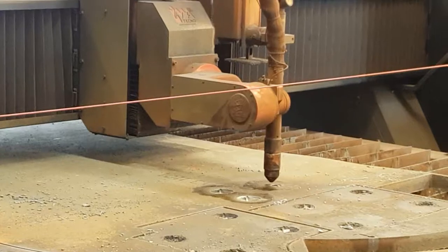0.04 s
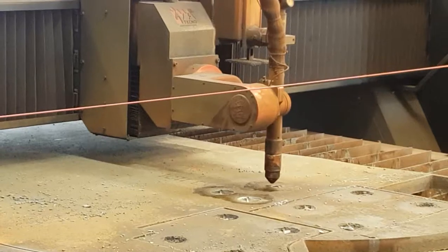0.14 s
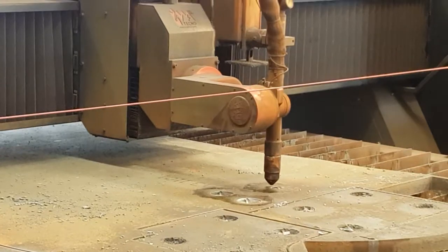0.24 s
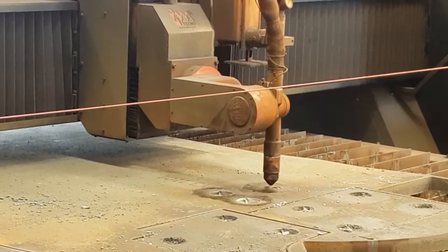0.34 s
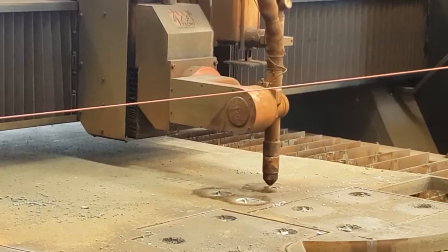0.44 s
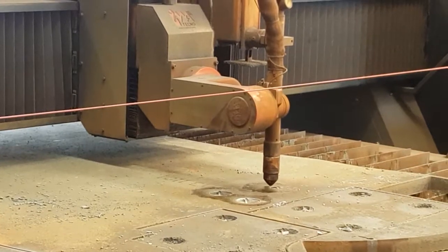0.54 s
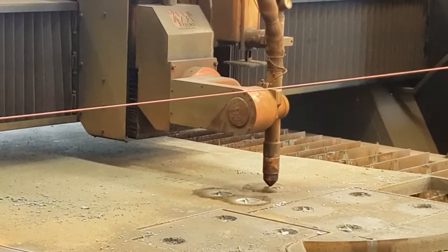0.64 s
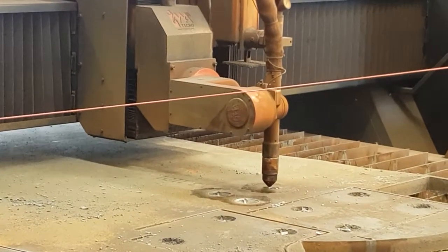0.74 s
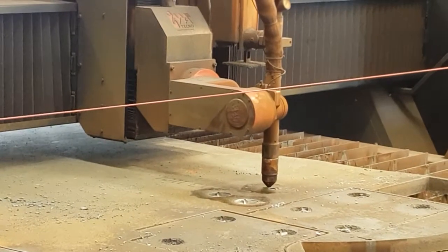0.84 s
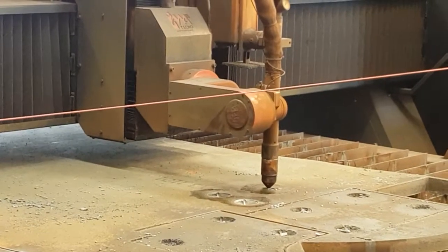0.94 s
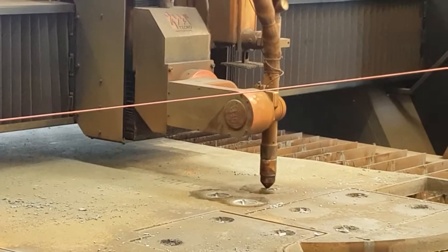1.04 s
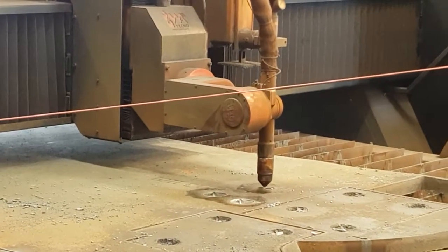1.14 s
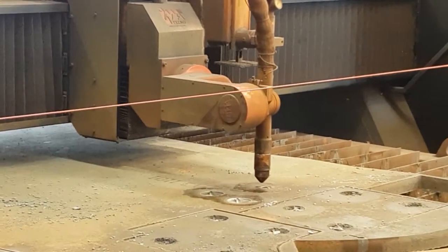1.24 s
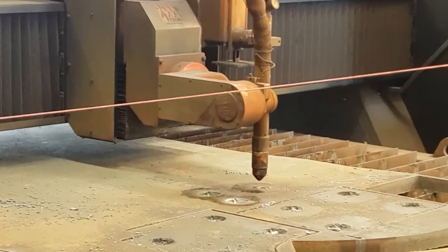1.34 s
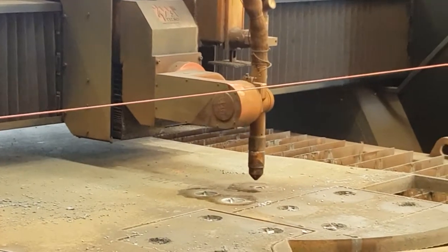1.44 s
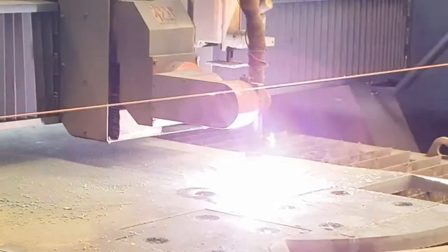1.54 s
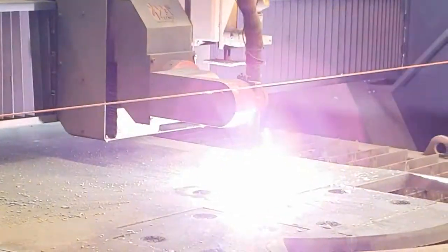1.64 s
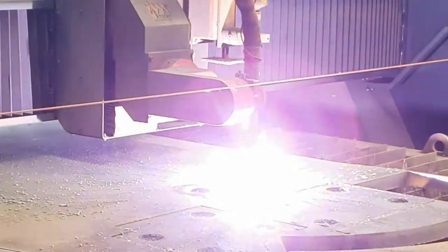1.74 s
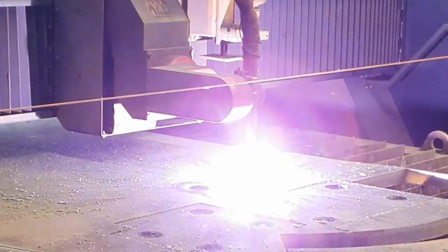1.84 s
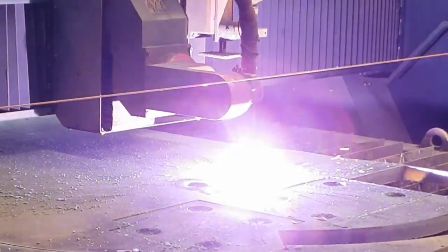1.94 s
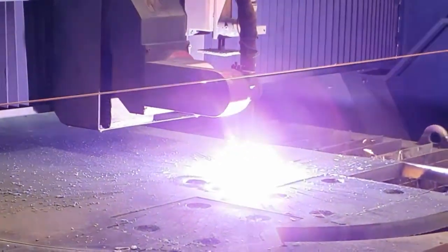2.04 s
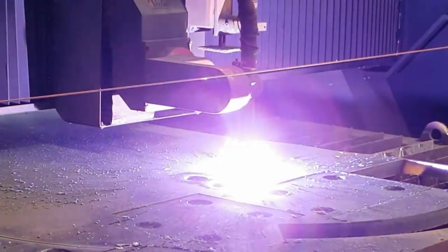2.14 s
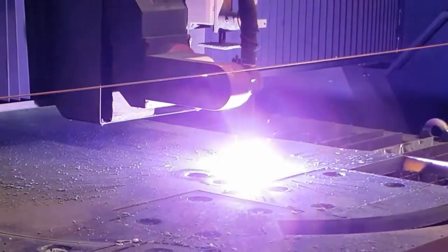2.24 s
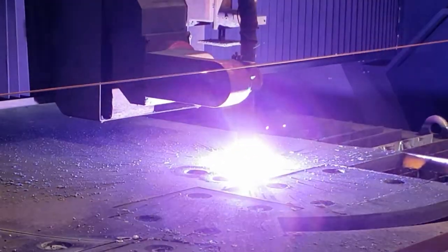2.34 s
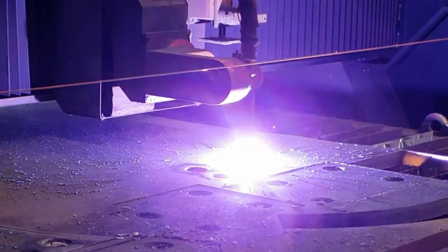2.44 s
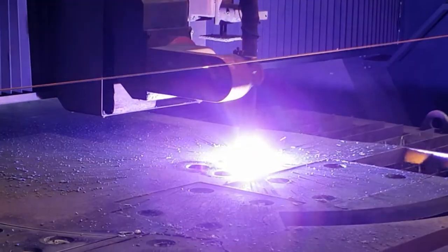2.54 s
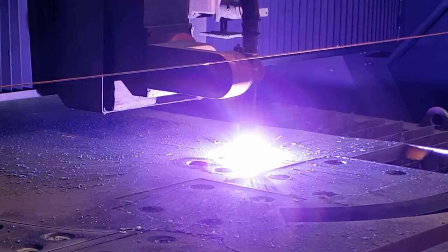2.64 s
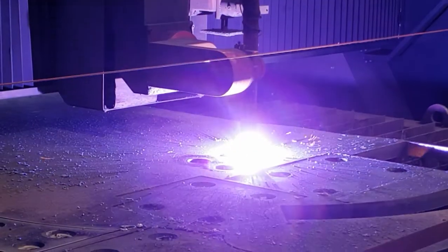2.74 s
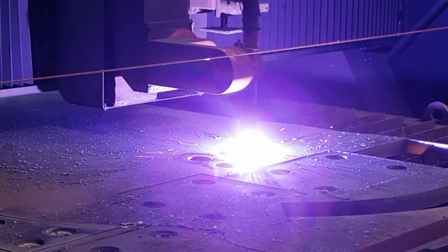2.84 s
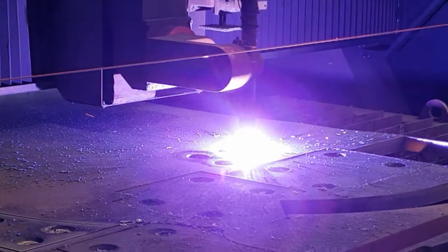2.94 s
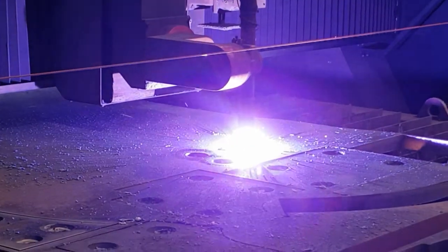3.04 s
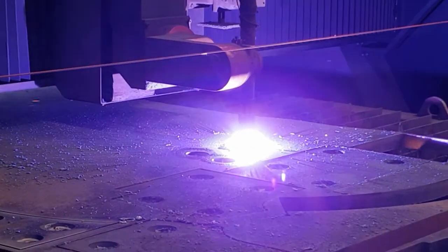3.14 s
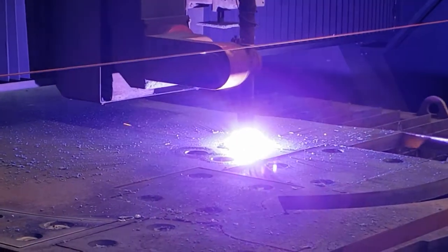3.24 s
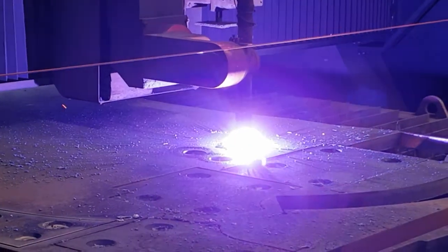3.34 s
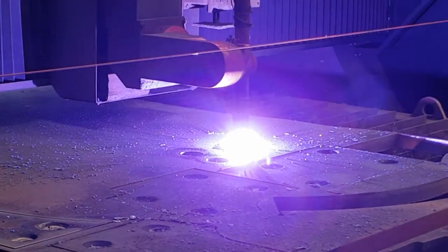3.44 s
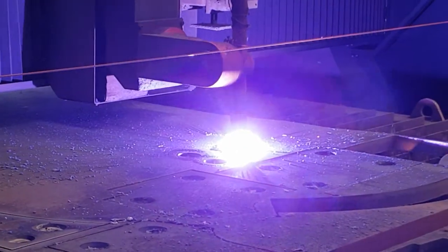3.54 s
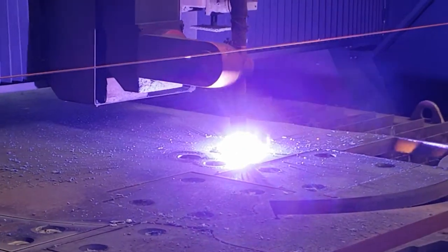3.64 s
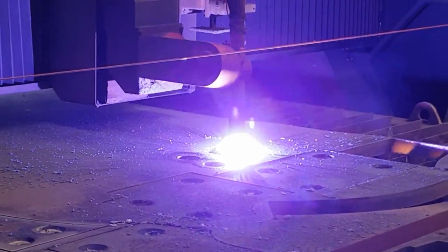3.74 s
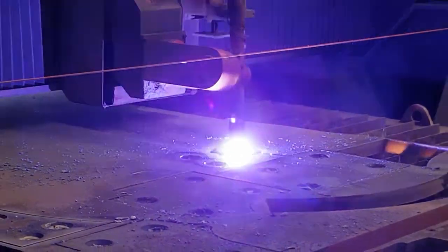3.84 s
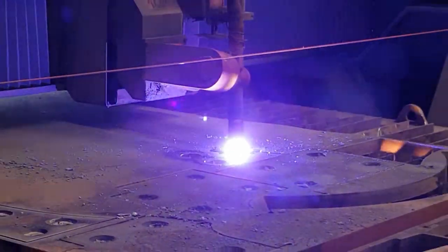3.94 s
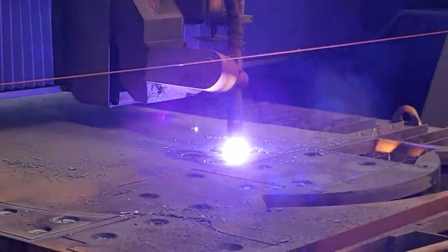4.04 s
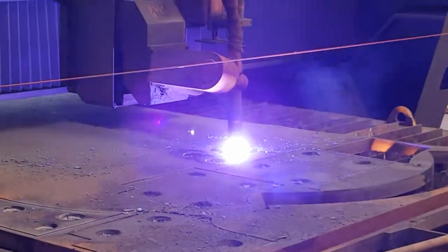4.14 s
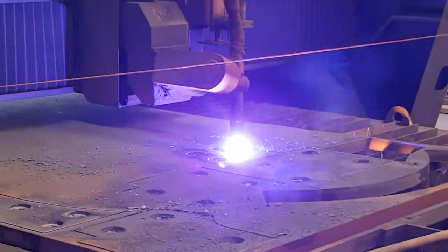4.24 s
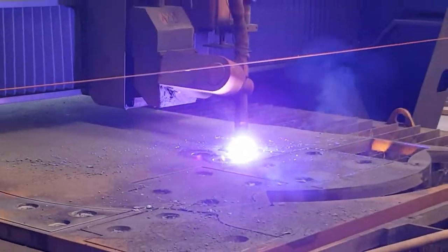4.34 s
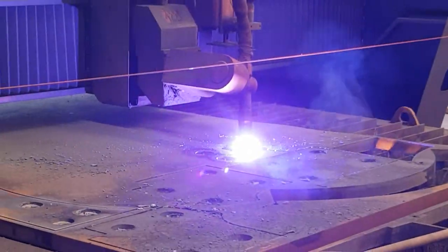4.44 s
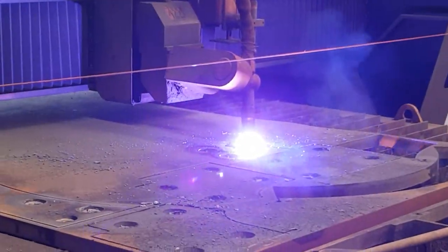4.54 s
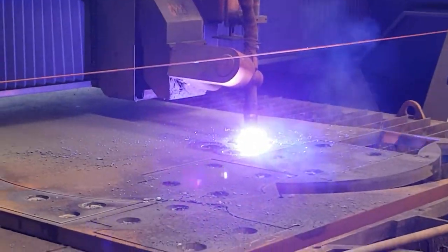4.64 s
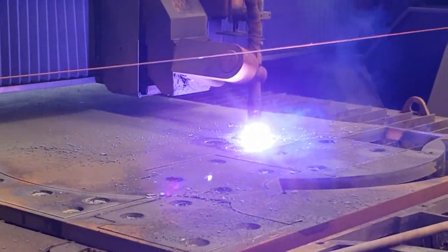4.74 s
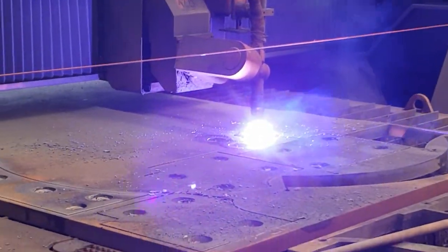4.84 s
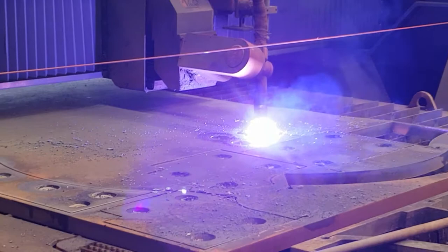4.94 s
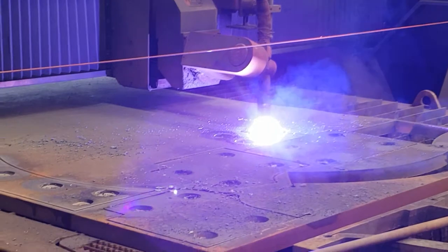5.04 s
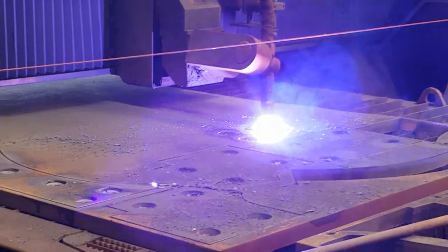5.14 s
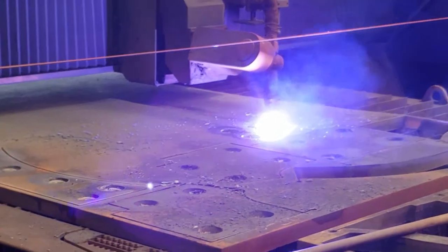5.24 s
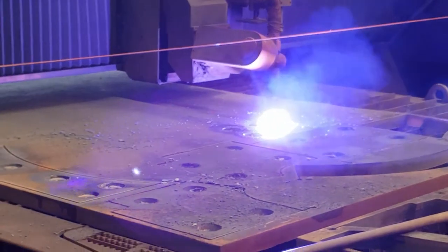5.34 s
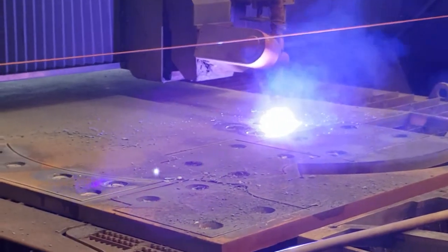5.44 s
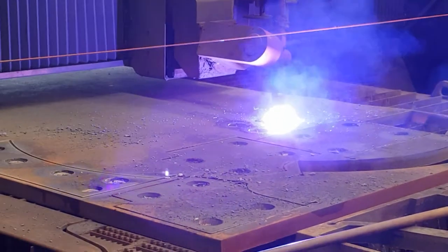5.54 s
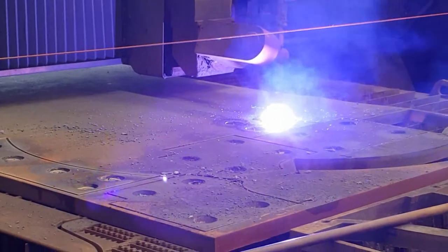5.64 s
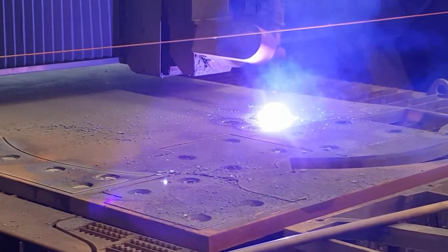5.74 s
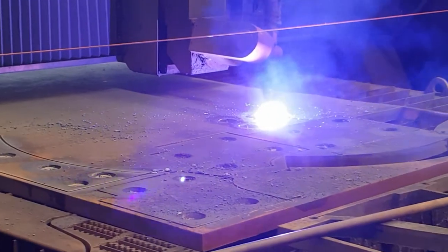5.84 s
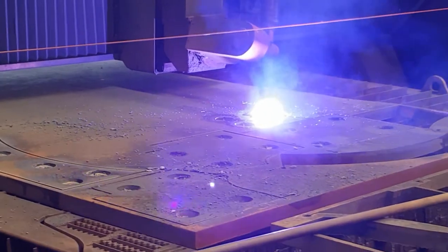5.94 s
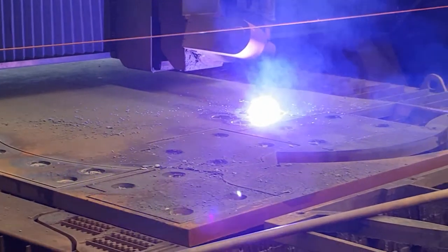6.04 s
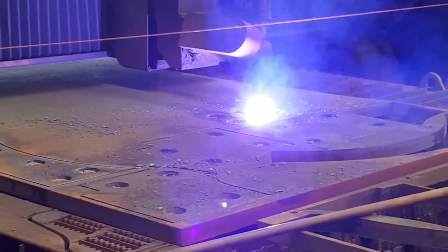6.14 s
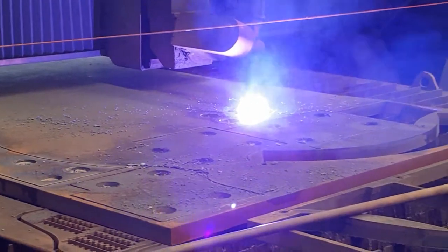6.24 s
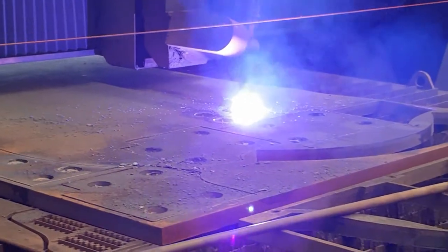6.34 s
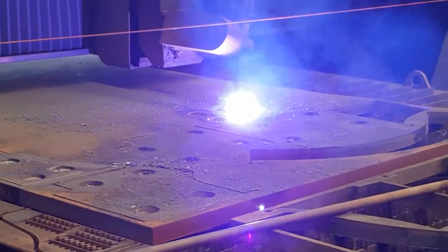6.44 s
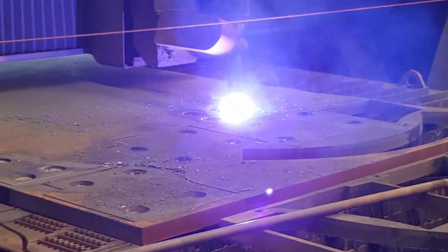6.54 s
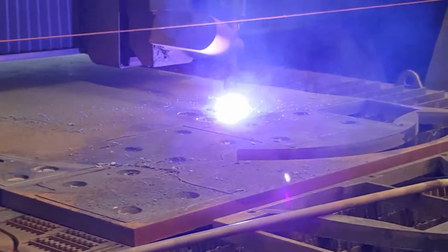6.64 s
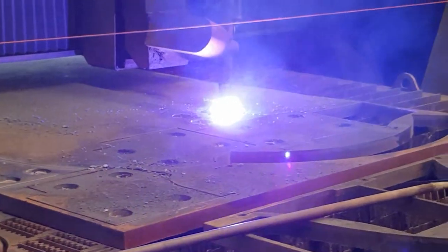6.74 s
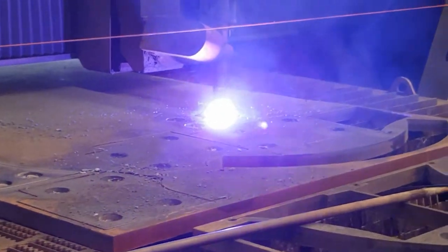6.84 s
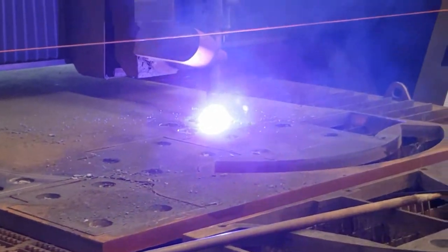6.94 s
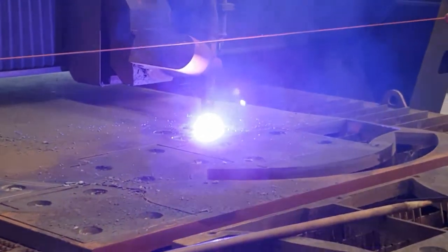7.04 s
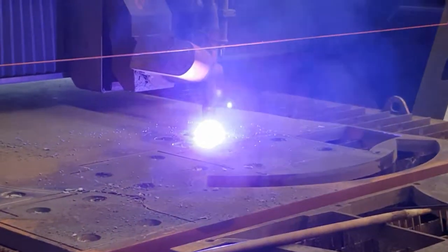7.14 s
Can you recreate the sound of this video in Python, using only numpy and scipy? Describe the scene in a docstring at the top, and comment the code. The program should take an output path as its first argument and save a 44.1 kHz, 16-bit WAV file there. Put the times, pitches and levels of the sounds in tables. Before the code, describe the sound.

Fume extraction rumbles and unlit gas hisses, then a plasma arc snaps alight into a loud flickering roar with a shrill, throbbing whistle.

```python
"""Plasma torch piercing thick steel plate in a workshop, heard from a few metres away.
First fume extraction rumbles (shaped noise, fan tones) and unlit gas hisses (noise, nozzle resonances).
At 1.545 s the arc strikes: a flash of hiss, a short bark, then the roar (flickering noise) with spatter cracks.
The rumble is heard at a lower level under the arc; a low rush in the ducts shuts off late in the cut.
From about 1.9 s a shrill whistle (phase-modulated tone) surges over sliding hollow resonances of the pit."""
import sys
import numpy as np
from scipy import signal
from scipy.fft import irfft
from scipy.io import wavfile
from scipy.ndimage import uniform_filter1d

SR = 44100
rng = np.random.default_rng(int(sys.argv[2]) if len(sys.argv) > 2 else 0)


def unload_wav(signal):
    """Save mono or channel-first audio to the path in sys.argv[1] as 16-bit WAV at rate SR, clipped to [-1, 1]."""
    wavfile.write(
        sys.argv[1],
        SR,
        np.round(np.clip(np.atleast_2d(signal).T, -1, 1) * 32767).astype(np.int16),
    )


N = 317079

STRIKE_S = 1.545
TREBLE_HZ = 9000
CUT_HZ = 15700
SIZE = 4096  # samples per noise frame, half overlapped
TIME = np.arange(N) / SR
FREQS = np.arange(SIZE // 2 + 1) * SR / SIZE
# frame times in s: the slow clock on which the colour of a noise changes
MOMENTS = np.arange(2 * N // SIZE + 2)[:, None] * SIZE / 2 / SR


def undb(db):
    """Decibels to gain."""
    return 10 ** (np.asarray(db) / 20)


def unit(x):
    """Scale to rms 1."""
    return x / np.sqrt(np.mean(np.abs(x) ** 2))


def curves(table):
    """Each column of a timed table, sample by sample."""
    s, *columns = np.transpose(table)
    return [np.interp(TIME, s, column) for column in columns]


def over_freq(table, freqs):
    """Join (Hz, value) points on a log-frequency axis."""
    hz, value = np.transpose(table)
    return np.interp(np.log(np.maximum(freqs, 1)), np.log(hz), value)


def bell(t, s, spread_s):
    """Smooth swell to 1 at time s and back; 1/e at spread_s."""
    return np.exp(-((t - s) / spread_s) ** 2)


def walk(rate_hz):
    """Smooth random wander with spread near 1."""
    k = max(int(SR / rate_hz), 2)
    steps = np.repeat(rng.standard_normal(N // k + 1), k)[:N]
    return 1.24 * uniform_filter1d(uniform_filter1d(steps, k), k)


def smear(width_hz):
    """Slowly turning random amplitude and phase, one for each channel."""
    steps_s = np.arange(0, N / SR + 1, 0.5 / width_hz)
    real, imag = rng.standard_normal((2, 2, len(steps_s)))
    return unit(np.array([np.interp(TIME, steps_s, r + 1j * i) for r, i in zip(real, imag)]))


def broad(colour):
    """Power per frequency of a broad spectrum, total 1."""
    power = undb(over_freq(colour, FREQS)) ** 2
    return power / power.sum()


def peak(hz, width_hz):
    """Power per frequency of one resonance, total 1; -6 dB at hz +- width_hz."""
    power = 1 / (1 + ((FREQS - hz) / width_hz) ** 2) ** 2
    return power / power.sum(axis=-1, keepdims=True)


def resonances(table):
    """Summed power of (f/Hz, width/Hz, level/dB) resonances."""
    return sum(undb(db) ** 2 * peak(hz, width_hz) for hz, width_hz, db in table)


def eddies(depth_db, size=9, count=5, full_hz=4000):
    """Narrow parts of a jet's spectrum swell and fade on their own over 0.1-0.2 s; the lows stay even."""
    field = rng.standard_normal((len(MOMENTS), len(FREQS)))
    field = uniform_filter1d(uniform_filter1d(field, size, axis=1), count, axis=0)
    return undb(depth_db * np.minimum(FREQS / full_hz, 1) * unit(field)) ** 2


# likeness of the two channels: f/Hz, correlation
LIKENESS = [(60, 0.97), (200, 0.94), (400, 0.84), (700, 0.9), (1300, 0.32), (2200, 0.0036)]
# reflections off plate, gantry and walls reaching both microphones: right after left/ms, share
PATHS = [(-0.4, 0.1), (1.5, 0.21), (-2, 0.21), (5.5, 0.17), (-8, 0.19), (11.5, 0.3), (-15, 0.14)]


def turbulence(power):
    """Stereo noise with the given power per moment and frequency, overlap-added from random spectra."""
    real, imag = rng.standard_normal((2, 2, len(MOMENTS), len(FREQS)))
    left, diffuse = (real + 1j * imag) * np.sqrt(power)
    # the bass is alike in both channels; higher up only a few reflections are shared
    alike = np.clip(over_freq(LIKENESS, FREQS), 0, 1)
    reflected = sum(share * np.exp(-2j * np.pi * FREQS * ms / 1000) for ms, share in PATHS)
    shared = alike + (1 - alike) * reflected
    shared = shared / np.maximum(np.abs(shared), 1)
    right = shared * left + np.sqrt(np.maximum(1 - np.abs(shared) ** 2, 0)) * diffuse
    puffs = irfft(np.array([left, right])) * signal.windows.cosine(SIZE) * SIZE / 2
    overlapped = puffs[:, :-1, SIZE // 2:] + puffs[:, 1:, :SIZE // 2]
    return overlapped.reshape(2, -1)[:, :N]


# fan tones: f/Hz, width/Hz, level re rumble/dB
FAN = [(333.5, 9, -11), (486, 8, -18.5), (819, 8, -21)]


def fans():
    """The fans sing a few faint, slightly wavering tones."""
    tones = 0
    for hz, width_hz, db in FAN:
        waver = smear(width_hz)[0]
        tones = tones + undb(db) * np.sqrt(2) * np.real(waver * np.exp(2j * np.pi * hz * TIME))
    return tones


# rumble as heard, lower under the arc: t/s, level/dB
RUMBLE = [(0, -27), (1.5, -26), (1.62, -35), (2.05, -38.5), (2.6, -42.5), (5, -42), (6, -49.5),
          (6.7, -50.5), (7.19, -45.5)]
# rumble spectrum: f/Hz, relative density/dB
RUMBLE_COLOUR = [(25, -42), (50, -31), (80, -3), (125, 0.5), (320, 2), (400, -2), (500, -2.5), (700, -5),
                 (1000, -21), (2000, -21)]
# low rush of air in the ducts, one resonance: f/Hz, width/Hz, level/dB
RUSH = (410, 124, -44)
RUSH_STOP_S = 6.57


def extraction(deep_hz=49, deep_width_hz=17, deep_db=-45, deep_drop_ratio=3.8):
    """Air rumbles in the fume ducts, with faint fan tones and a low rush that shuts off."""
    db, = curves(RUMBLE)
    rumble = undb(db + 0.28 * walk(6.5)) * (turbulence(broad(RUMBLE_COLOUR)) + fans())
    # the deepest band drops further in level than the rest under the arc
    deep = undb(deep_db + deep_drop_ratio * (db - db.max())) * turbulence(peak(deep_hz, deep_width_hz))
    rush_hz, rush_width_hz, rush_db = RUSH
    rush_gate = np.clip((RUSH_STOP_S - TIME) / 0.024, 0, 1)
    rush = undb(rush_db) * rush_gate * turbulence(peak(rush_hz, rush_width_hz))
    return rumble + deep + rush


# faint machine hum: f/Hz, width/Hz, level/dB
HUM = [(118, 3.6, -61), (176.4, 4, -57.5), (239, 4, -54)]


def machine_hum():
    """The machine hums faintly in narrow noise bands."""
    return turbulence(resonances(HUM))


# gas flow before the strike: t/s, level before flow_gain_db/dB, treble re rest/dB
PREFLOW = [(0.25, -31, 6.5), (0.55, -31, 3), (1, -31, 2.5), (1.22, -29.5, 4.5), (1.45, -30, 4)]
# gas spectrum: f/Hz, relative density/dB
GAS_COLOUR = [(500, -29), (900, -2.5), (1300, -8.5), (1900, -7), (2600, 1.5), (3100, -2), (3900, 4),
              (4900, -3.5), (6200, 4.5), (6900, -9), (7700, -17), (8700, -28), (11200, -13.5), (15700, -13)]
# nozzle tones of the cold gas: f/Hz, width/Hz, level before flow gain/dB
NOZZLE = [(3730, 50, -11.5), (4000, 150, -13), (5310, 150, -5), (6130, 60, -6), (8050, 100, -26),
          (9270, 110, -24)]


def cold_gas(flow_gain_db=5.5, broad_db=2.5):
    """Unlit gas hisses through the nozzle and sounds its narrow tones."""
    db, treble_db = curves(PREFLOW)
    power = (undb(broad_db) ** 2 * broad(GAS_COLOUR) + resonances(NOZZLE)) * eddies(depth_db=3.0)
    treble = FREQS > TREBLE_HZ
    hiss = turbulence(power * ~treble) + undb(treble_db) * turbulence(power * treble)
    return undb(db + flow_gain_db) * hiss


# spectra of roar and top hiss, shared by spatter and jet: f/Hz, relative density/dB
JET_COLOUR = [(200, -50), (480, -18), (650, -7), (900, -9.5), (1600, -9), (2600, -4.5), (3200, -5.5),
              (4200, -1), (5700, 1.7), (6300, -0.4), (7100, -10), (8100, -25.5), (9300, -16), (11000, -13)]
TOP_COLOUR = [(8500, -51), (9700, -4.5), (10800, 3), (12600, 5), (14000, 0), (15700, -4.5)]


def spatter(per_s=400, spread_db=4.5, decay_s=0.0012):
    """Molten drops burst as tiny cracks, most of them faint: decaying noise bursts at random times."""
    size_db = spread_db * np.minimum(rng.exponential(size=N), 4)
    bursts = (rng.random(N) < per_s / SR) * undb(size_db)
    envelope = signal.lfilter([1], [1, -np.exp(-1 / (decay_s * SR))], bursts)
    return unit(envelope * turbulence(broad(JET_COLOUR) + undb(-1) ** 2 * broad(TOP_COLOUR)))


# burning jet, before gains and flicker: t/s, roar level/dB, top hiss level/dB
JET = [(1.62, -17, -23), (1.82, -16, -21), (1.99, -17.7, -26.5), (2.4, -18.5, -23.5), (2.85, -19, -28.5),
       (3.45, -19.5, -25.5), (3.8, -17.5, -24.5), (4.2, -19, -25), (4.55, -18.5, -23), (4.74, -19, -26),
       (5.0, -19.5, -21.5), (5.25, -18.8, -27.5), (5.95, -18, -25.5), (6.22, -17.5, -27), (6.39, -17, -23),
       (6.52, -19.8, -25.5), (7.19, -20, -24)]
# steady resonances of plate and table: f/Hz, width/Hz, level before roar level/dB
PLATE = [(757, 30, -19.5), (1277, 40, -23), (2420, 45, -42), (3610, 45, -17.5)]
# flash of the strike: f/Hz, relative density/dB
FLASH_COLOUR = [(2000, -10), (6300, -7), (8000, -9), (9400, -8), (10600, 0), (11800, 1), (13300, 7),
                (15700, -1.5)]
ROAR_START, ROAR_BUILD_S = 0.25, 0.023  # share of full strength at the strike, time constant
FLASH_DB, FLASH_DECAY_S = -13.5, 0.12


def jet(flutter_db=1.0, roar_flicker_db=0.92, top_flicker_db=0.6, spatter_db=-14, broad_db=3):
    """The hot jet roars, hisses and rings the steel; the restless arc shakes all of it together."""
    db, top_db = curves(JET)
    age_s = np.maximum(TIME - STRIKE_S, 0)
    build = 1 - (1 - ROAR_START) * np.exp(-age_s / ROAR_BUILD_S)
    roar_power = undb(broad_db) ** 2 * broad(JET_COLOUR) + resonances(PLATE)
    roar = turbulence(roar_power * eddies(depth_db=2.0, count=3))
    roar = undb(-0.89 + roar_flicker_db * walk(40)) * roar
    roar = build * undb(db) * (roar + undb(spatter_db) * spatter())
    top = turbulence(broad(TOP_COLOUR) * eddies(depth_db=2.7, count=3))
    top = undb(top_db - 0.5 + top_flicker_db * walk(160)) * top
    flash = undb(FLASH_DB) * np.exp(-age_s / FLASH_DECAY_S) * turbulence(broad(FLASH_COLOUR))
    return undb(flutter_db * walk(130)) * (roar + top + flash)


# bark as the arc first meets the plate: f/Hz, width/Hz, level/dB
BARK = [(2120, 150, -28), (2430, 110, -23), (2680, 170, -25.5)]
BARK_HOLD_S, BARK_DECAY_S = 0.083, 0.031


def bark():
    """The fresh arc rings a few close resonances, which hold briefly and die away."""
    fading_s = np.maximum(TIME - STRIKE_S - BARK_HOLD_S, 0)
    return np.exp(-fading_s / BARK_DECAY_S) * turbulence(resonances(BARK))


# hollow resonances of the pit, plus one broad swell of top hiss near 13.9 kHz:
# t of peak/s, spread/s, f at peak/Hz, slide/(Hz/s), width/Hz, level at peak/dB
PIT = [(1.69, .17, 2750, 0, 550, -28), (1.71, 0.19, 4240, 0, 990, -15.8), (1.82, 0.14, 5500, 0, 250, -28),
       (1.95, 0.46, 3640, 5, 110, -25.5), (3.6, 0.57, 5050, -700, 600, -23),
       (3.79, .13, 4800, -900, 500, -23), (3.67, 0.048, 1320, 0, 25, -29), (4.0, 0.52, 1317, 0, 28, -34.5),
       (4.15, .24, 4190, -500, 280, -24), (4.3, 0.31, 1100, -40, 38, -36),
       (4.6, 0.64, 13900, -600, 1310, -27), (5.05, 0.65, 4130, -300, 600, -26),
       (5.3, 0.42, 1954, 0, 45, -35), (5.45, 0.68, 704, -15, 100, -32.5), (5.7, .2, 4230, -1, 30, -32),
       (5.77, 0.064, 5650, 0, 35, -29), (5.95, 0.26, 4270, 1, 990, -24), (6.35, 0.92, 2820, -100, 298, -28),
       (6.3, 0.14, 730, 0, 100, -36), (6.42, 0.48, 1050, 0, 80, -40), (6.9, .43, 1970, 0, 302, -31.5),
       (6.85, .25, 4900, 0, 700, -32)]


def pit_and_hiss_swell():
    """The jet rings hollow resonances of the deepening pit in turn; one broad top hiss swells as well."""
    power = 0
    for s, spread_s, hz, slide_hz_per_s, width_hz, db in PIT:
        swell = undb(db) ** 2 * bell(MOMENTS, s, spread_s)
        power = power + swell * peak(hz + slide_hz_per_s * (MOMENTS - s), width_hz)
    flutter = undb(1.2 * np.tanh(walk(90)))
    return flutter * turbulence(power * eddies(depth_db=3.3, size=6, count=3))


# whistle held between surges: t/s, level/dB
WHISTLE = [(1.85, -33), (2.1, -23), (2.3, -19.5), (2.43, -16), (2.65, -14.5), (2.9, -15), (3.3, -19),
           (3.7, -21), (4.2, -18.5), (4.55, -20.5), (4.95, -15.5), (5.2, -19), (5.7, -23), (6.1, -22),
           (6.55, -25), (6.9, -23), (7.19, -20)]
# surges as the jet locks firmly onto the pit: t/s, length/s, peak level before surge_db/dB
SURGES = [(2.038, 0.038, -19), (2.173, 0.032, -14.5), (2.257, 0.045, -16), (2.38, 0.034, -12),
          (2.53, .085, -9), (2.623, 0.031, -12), (2.802, 0.063, -11), (3.027, 0.029, -12.5),
          (3.18, 0.054, -13.5), (3.361, 0.031, -11), (3.468, 0.048, -11.5), (3.58, .035, -15),
          (3.632, .03, -13), (3.69, 0.038, -13.5), (4.08, 0.086, -15.5), (4.316, .02, -18),
          (4.411, 0.025, -14), (4.66, .037, -15), (4.755, .026, -13.5), (4.833, 0.022, -5),
          (4.894, 0.016, -8), (4.949, 0.021, -13), (5.017, 0.047, -7.5), (5.267, 0.038, -18),
          (5.396, .021, -15.5), (5.535, 0.044, -14), (5.852, 0.039, -13.5), (6.027, 0.027, -10),
          (6.135, .041, -18), (6.313, .04, -17), (6.499, .03, -12), (6.735, 0.028, -17.5),
          (6.98, .034, -21), (7.127, 0.035, -17)]


def whistle_strength(throb=0.82, surge_throb=0.58, throb_per_s=125, surge_db=1.1):
    """A held tone that flickers quickly, with firmer surges on top."""
    db, = curves(WHISTLE)
    surge_power = sum(undb(peak_db + surge_db) ** 2 * bell(TIME, s, length_s / 2)
                      for s, length_s, peak_db in SURGES)
    # slow wander removed: the tone keeps dropping out, but never for long
    jitter = walk(throb_per_s)
    shake = np.tanh(unit(jitter - uniform_filter1d(jitter, SR // 20)) + 0.5)
    held = undb(db) * unit(1 + throb * shake)
    surging = np.sqrt(surge_power) * unit(1 + surge_throb * shake)
    return np.hypot(held, surging)


# whistle pitch, wavering at first, then rising as the pit deepens: t/s, f/Hz
WHISTLE_PITCH = [(1.97, 5620), (2.03, 5424), (2.12, 5510), (2.18, 5415), (2.25, 5490), (2.38, 5410),
                 (2.55, 5385), (2.6, 5422), (2.67, 5425), (2.71, 5515), (2.79, 5595), (2.83, 5605),
                 (2.86, 5725), (2.92, 5860), (3.04, 5885), (3.15, 5947), (3.42, 5950), (3.8, 6000),
                 (5.05, 6090), (5.8, 6142), (7.19, 6165)]
# whistle leaning left: t/s, left minus right/dB
WHISTLE_PAN = [(2.3, 3), (2.5, 1), (2.7, 2), (3.1, 2.5), (3.25, 10), (3.42, 3.5), (4.9, 2), (7.19, 2.5)]
WHISTLE_CEILING_DB = -8
OCTAVE_S, OCTAVE_SPREAD_S = 2.45, 0.27


def whistle(wobble_hz=11, scatter_hz=45, scatter_db=-8, rasp_db=-5.0, drift_rad=0.63, octave_db=-27.5):
    """The jet locks into a shrill, throbbing tone; the room smears it differently for each channel."""
    hz, = curves(WHISTLE_PITCH)
    phase = 2 * np.pi * np.cumsum(hz + wobble_hz * walk(90)) / SR
    # low pitch = shallow pit: the tone is raspy
    rasp = undb(rasp_db) * np.interp(hz, [5600, 5950], [1, 0])
    octave = undb(octave_db) * bell(TIME, OCTAVE_S, OCTAVE_SPREAD_S) * unit(0.5 + smear(110))
    # the tone reaches the microphones out of step, and the lag drifts as they move
    lag_rad = np.pi / 2 + drift_rad * walk(4.4)
    direct = np.exp(1j * np.array([[0], [1]]) * lag_rad)
    scatter = undb(scatter_db)
    field = direct + scatter * smear(scatter_hz) + rasp * smear(150)
    field = field / np.sqrt(1 + scatter ** 2 + rasp ** 2)
    pan_db, = curves(WHISTLE_PAN)
    swing = whistle_strength() * field * undb(np.array([pan_db, -pan_db]) / 2)
    # the jet can drive the tone only so hard
    swing = swing / (1 + (np.abs(swing) / undb(WHISTLE_CEILING_DB)) ** 4) ** (1 / 4)
    locked = np.clip((TIME - 1.85) / 0.091, 0, 1)
    return locked * np.sqrt(2) * np.imag(swing * np.exp(1j * phase) + octave * np.exp(2j * phase))


def reflect(x, wet_db, t60_s, count=40, order=5):
    """Plate, gantry and walls return scattered early echoes, which shift as the microphones move about."""
    weights = np.array([walk(3) for _ in range(order)])
    out = x
    for weight in weights / np.linalg.norm(weights, axis=0):
        response = np.zeros((2, SR // 8))
        for channel in response:
            lags = rng.integers(SR // 700, SR // 8, count)
            echoes = rng.choice([-1, 1], count) * undb(-60 * lags / SR / t60_s)
            channel[lags] = undb(wet_db) * echoes / np.linalg.norm(echoes)
        out = out + weight * signal.fftconvolve(x, response, axes=1)[:, :N]
    return out / np.sqrt(1 + undb(2 * wet_db))


def scene():
    """The arc lights within a few milliseconds and takes over from the cold gas."""
    lit = np.clip((TIME - STRIKE_S) / 0.0035, 0, 1)
    torch = (1 - lit) * cold_gas() + lit * (jet() + bark() + pit_and_hiss_swell())
    room = reflect(torch, wet_db=-8.5, t60_s=0.2)
    return extraction() + lit * machine_hum() + room + whistle()


def record(dry, low_cut_hz=38):
    """The deepest bass is thinned; the recorder rounds the highest peaks and cuts the top."""
    high_pass = signal.butter(2, low_cut_hz, "high", fs=SR, output="sos")
    thinned = signal.sosfilt(high_pass, dry)
    rounded = thinned / (1 + (thinned / 1.05) ** 6) ** (1 / 6)
    low_pass = signal.ellip(12, 0.1, 75, CUT_HZ, fs=SR, output="sos")
    return signal.sosfilt(low_pass, rounded)


dry = scene()
out = record(dry)
unload_wav(out)
```